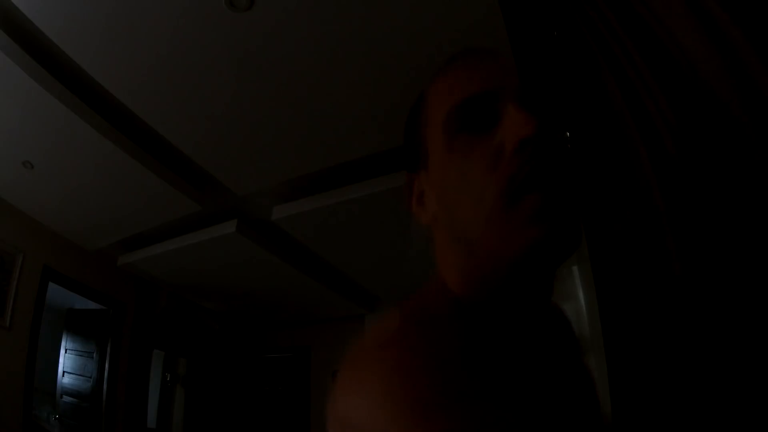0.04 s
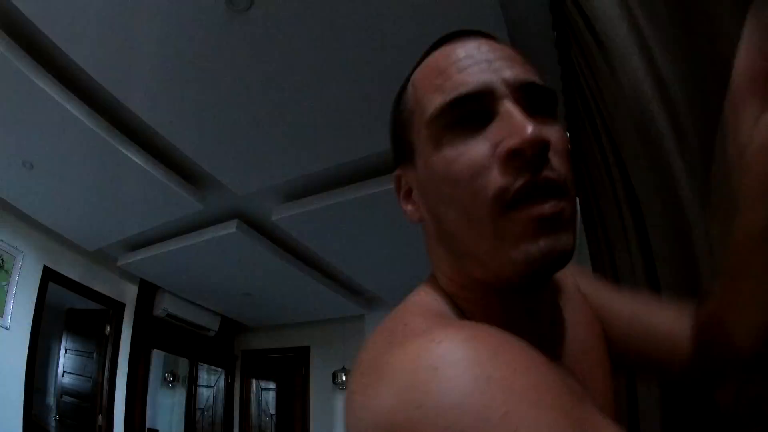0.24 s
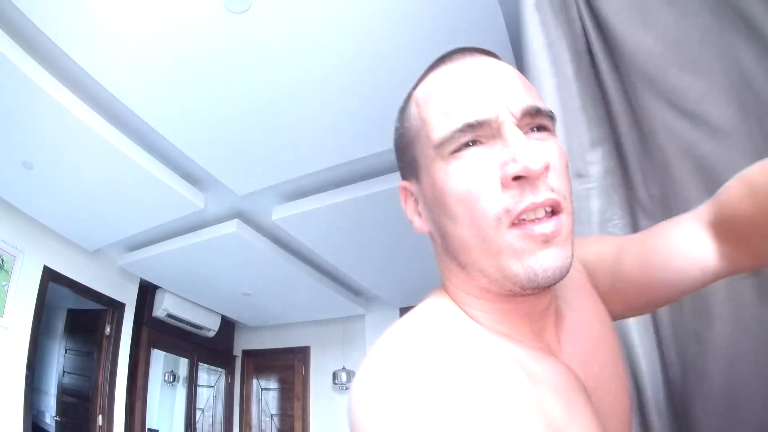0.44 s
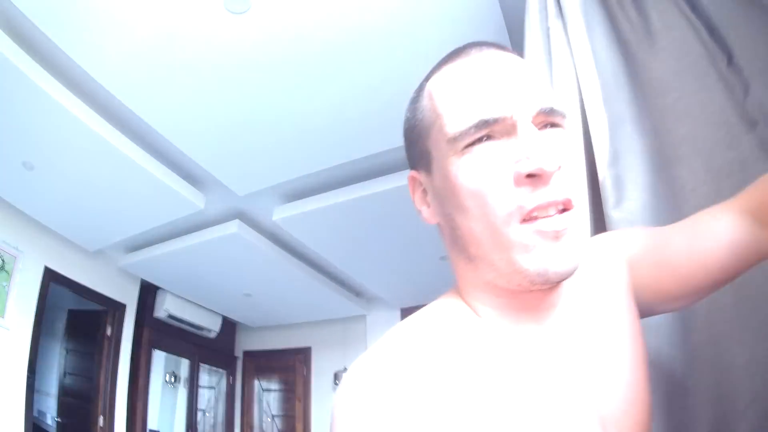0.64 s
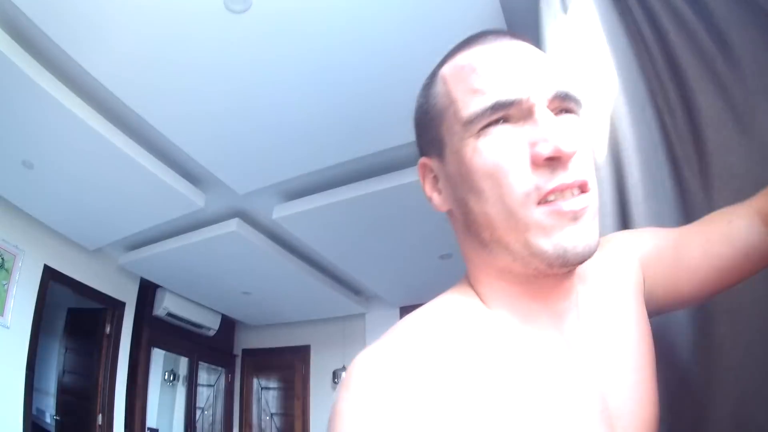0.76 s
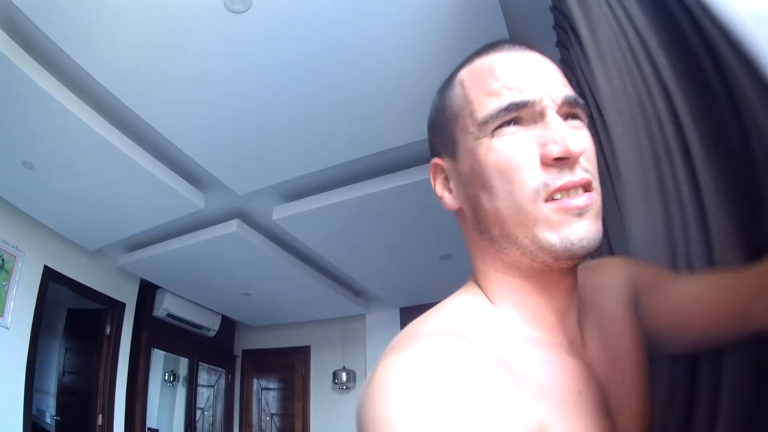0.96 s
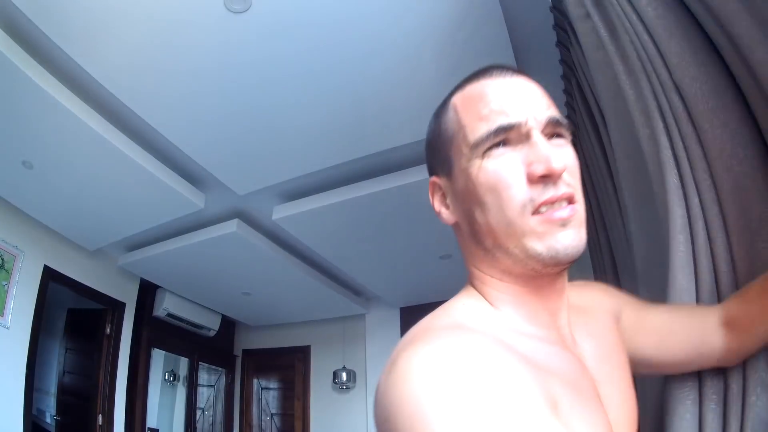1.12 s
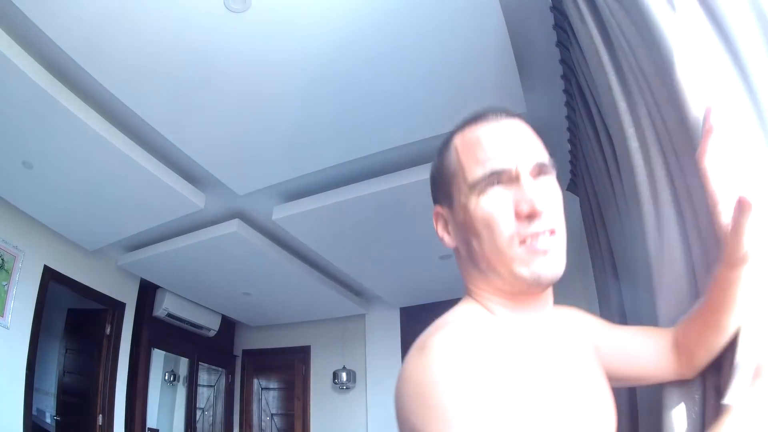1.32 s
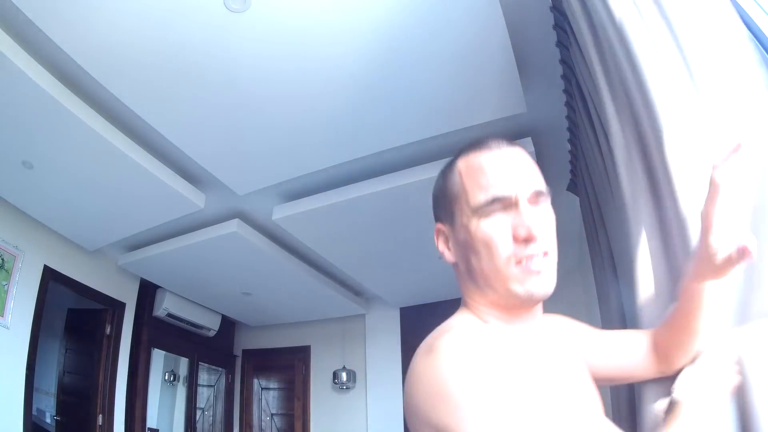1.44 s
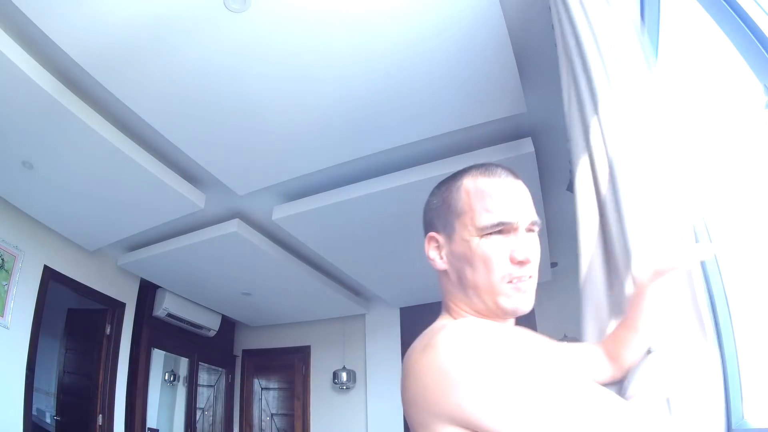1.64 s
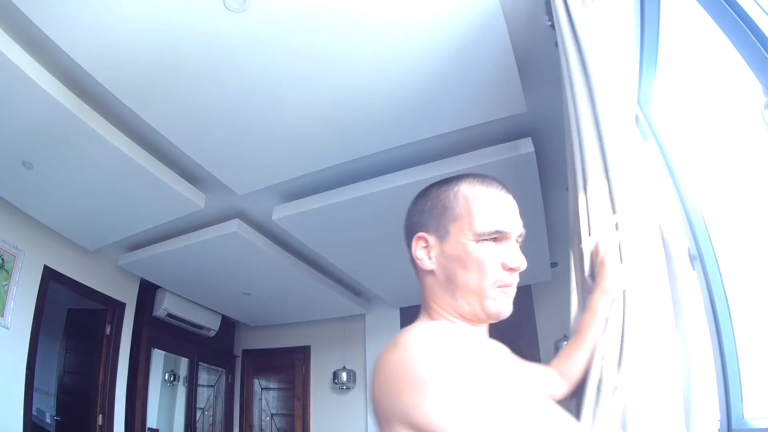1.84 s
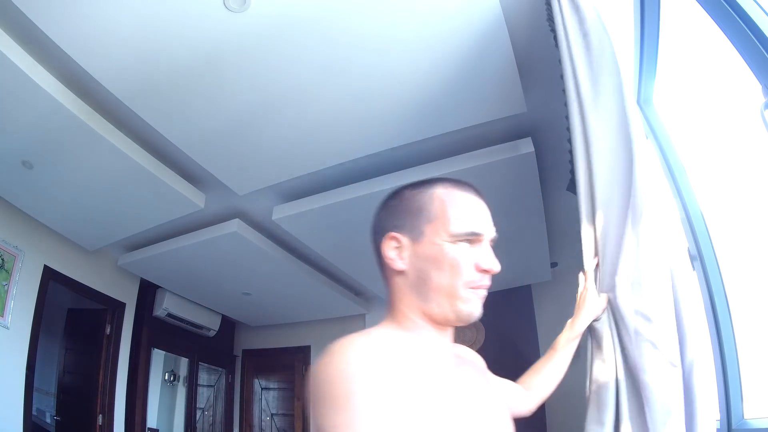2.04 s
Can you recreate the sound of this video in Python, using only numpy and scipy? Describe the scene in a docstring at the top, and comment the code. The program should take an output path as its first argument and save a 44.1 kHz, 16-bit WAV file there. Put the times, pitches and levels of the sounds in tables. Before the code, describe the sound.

Close up in a lightly echoing room, curtain gliders rasp and chatter along a hollow, droning rail. The first drag fades into light knocks, then a second, hissier drag swells and dies into faint ticks.

```python
"""Furnished room: a heavy curtain is dragged along its metal rail in two pulls, close to a small camera.
Gliders scrape (stick-slip grains, smooth rub, singing runners) and chatter (modes rung by random contacts).
The hollow rail drones (noise through resonances) and sways (low bending tone in a shudder).
Folds and rail thud (damped partials); gliders knock together (noise crack plus beating ring).
A decaying noise tail answers as the room, over steady air noise."""
import sys
import numpy as np
from scipy import signal
from scipy.fft import rfft, irfft, next_fast_len
from scipy.io import wavfile
from scipy.ndimage import map_coordinates

SR = 44100
rng = np.random.default_rng(int(sys.argv[2]) if len(sys.argv) > 2 else 0)


def store_pcm(level_fs):
    """Save levels as 16-bit WAV."""
    pcm = np.round(np.clip(level_fs, -1, 1) * 32767).astype(np.int16)
    wavfile.write(sys.argv[1], SR, np.atleast_2d(pcm).T)


def volts(x):
    """Linear amplitude factor 10**(x/20) for a level x in dB, scalar or array-like."""
    e = np.asarray(x, float) / 20
    return 10 ** e


N = 91772

# the hand's two pulls; chatter and weight on the rail are relative to the scrape:
# time_s, scrape_db, chatter_db, weight_db, treble_db
PULLS = [(0, -41, -20, 13, -11), (.045, -35.5, -16, 12.5, 2.5), (.058, -23.5, -23, 6.5, -15),
         (.08, -29, -11.5, 8.5, 1), (.14, -24, -12, 7, -0.5), (.2, -23.5, -12.5, 2, 0),
         (.27, -22, -16, 5, 0.5), (.35, -25, -14, 5, -0.5), (.42, -29.5, -19, 8, 3),
         (.48, -29.5, -14, 7, -19), (.53, -34.5, -24, 6.5, -4.5), (.62, -34.5, -20, 7, -3),
         (.68, -41, -14, 12.5, -2), (.73, -52.5, -18, 13.5, -5), (.77, -55.5, -14, 22.5, -3),
         (.82, -45.5, -13, 11, 0), (.88, -63.5, -12, 14, 3.5), (.97, -63, -28, 19, -2),
         (1.1, -53.5, -14, 13, -12), (1.18, -50.5, -12.5, 19, 19), (1.25, -54.5, -21, 15.5, -1.5),
         (1.285, -44.5, -23, 12.5, -8), (1.3, -41, -19, 6, 2), (1.34, -30.5, -10, 4.5, -2.5),
         (1.39, -36, -18, 7.5, -1), (1.44, -32.5, -15, 6, 0.5), (1.5, -27, -4, 1.5, 2),
         (1.56, -24, -14, -0.5, 3), (1.63, -24, -12, 0, 3.5), (1.7, -27, -12, 1.5, 1.5),
         (1.76, -33, -13, 8, 2), (1.82, -45.5, -16, 14, 2), (1.9, -49, -16, 15.5, 6),
         (2.03, -53.5, -13, 11.5, 2), (2.08, -44.5, -14, 2, 1)]
SECOND_PULL_S = 1.27
# rail colour, one list per pull: freq_hz, relative_level_db
RAIL_COLOURS = [
    [(290, -4), (500, -20), (705, -12.5), (1340, -11.5), (1690, -15), (3360, -13.5), (4540, -18.5),
     (7820, -20.5), (14500, -39.5), (15300, -48)],
    [(290, -28), (500, 0), (545, -12), (594, -9.5), (913, -8.5), (1010, -12), (1670, -12), (2600, -10.5),
     (4110, -17), (6050, -18), (10700, -28.5), (12000, -37), (15300, -40)],
]
# runners singing, one list per pull: freq_hz, width_hz, relative_level_db
RUNNERS = [
    [(2380, 200, -1), (3370, 220, 0)],
    [(2600, 350, 0), (11900, 700, -9)],
]
# singing relative to the coloured rub, one per pull: level_db
SINGING_DB = [-7.5, -16]
SLIPS_PER_S, SLIP_SPREAD_DB, SMOOTH_POWER_SHARE = 2300, 0.5, 0.54
UNEVEN_DB = 0.6  # slow wander of the drag

# glider and hook modes, t60 while rubbing: freq_hz, relative_level_db, t60_s
GLIDER_MODES = [(4810, -11, .03), (7690, -4, .055), (8870, -14, .03), (11560, -6.5, .04),
                (14350, -15, .025)]
CHATTER_PER_S, CHATTER_SPREAD_DB = 300, 3  # contacts of each glider
DETUNE = 0.012  # relative spread of pitch among gliders
BUNCHED_S, BUNCHED_DB = 1.4, 10  # bunched gliders damp one another from here on
FREE_RING = 3  # t60 ratio, knocked glider to rubbing one, before bunching

# hollow rail resonances: freq_hz, width_hz, relative_level_db
RAIL_MODES = [(125.8, 18.8, -3), (163.6, 8.7, 3), (194.4, 19.2, -3), (291, 38, -2.5), (408, 45, -3),
              (480, 33, -5), (530.3, 56, -3.5), (660, 360, -11.5), (1050, 700, -17.5)]
# reverberation: freq_hz, t60_s
ROOM_T60 = [(100, 0.69), (1000, 0.9), (10000, 0.45)]
ROOM_DB = -10.5
# rail swaying on its brackets: time_s, pitch_hz, level_db
SWAY_PATH = [(0.0, 46.7, -20.5), (0.03, 48.2, -42), (0.06, 50.5, -16.5), (0.11, 48.5, -25),
             (0.29, 54.6, -19), (0.32, 48.6, -32.5), (0.52, 48.5, -17.5), (0.54, 46.1, -38),
             (0.65, 47.14, -16.5), (0.77, 48.5, -29), (0.87, 48.8, -23.5), (1.01, 47.3, -37),
             (1.33, 47.3, -31), (1.38, 47.97, -31.5), (1.55, 49, -24.5), (1.66, 59.75, -26),
             (1.72, 58.33, -20), (1.8, 51.2, -29), (1.87, 46.93, -27.5), (2.08, 48.4, -32)]
# loose shudder spectrum: freq_hz, relative_level_db
SHUDDER_COLOUR = [(15, -30), (28, 15), (45, 7.5), (80, 12), (130, 3.5), (200, -46)]
SHUDDER_DB = -6.5  # over the sway tone
# room tone spectrum: freq_hz, relative_level_db
AIR_COLOUR = [(100, -22), (140, -3), (300, -14.5), (700, -21.5), (1500, -25), (3000, -34), (6000, -41),
              (10000, -42.5), (15400, -44)]
AIR_DB = -41.5

# soft thuds of folds and rail: start_s, level_db, pitch_hz, t60_s
THUD_EVENTS = [(.052, -14, 330, .05), (.056, -14, 1300, .04), (.072, -12, 300, .04), (.242, -14, 420, .1),
               (.391, -14, 300, .06), (.485, -14, 300, .05), (.57, -18, 100, .3), (.879, -34, 1000, .02),
               (1.074, -28, 380, .04), (1.101, -30, 500, .03), (1.318, -20, 300, .03),
               (1.89, -23, 400, .05), (.511, -7, 86, .18), (.8155, -26, 880, .05), (1.192, -24, 850, .03),
               (1.2095, -21, 780, .03), (1.249, -25, 500, .025), (1.2525, -17, 340, .04)]
# thud partials: ratio_to_pitch, amplitude_share
PARTIALS = [(.62, .35), (1, 1), (1.6, .45), (2.4, .25)]
THUD_RISE_S = 0.00095
# gliders knocking together, ring relative to level_db: start_s, level_db, ring_db
KNOCKS = [(0.0553, -15.5, -18.5), (0.3974, -20.5, -20), (0.6184, -25, -17), (0.6794, -37, -16),
          (0.7208, -43, -16), (0.7811, -37, -18), (0.7998, -40, -13), (0.8129, -29, -13),
          (1.1359, -35.5, -20), (1.1774, -25.5, -17), (1.291, -37, -16), (1.321, -37, -16),
          (1.3824, -32, -19), (1.4115, -27, -14), (1.7594, -22, -14), (1.8382, -29.5, -11),
          (2.0502, -36.5, -16)]
# knock noise spectrum: freq_hz, relative_level_db
CRACK_COLOUR = [(300, -32), (1500, 12), (2500, 0), (6000, -3), (12000, -10), (15500, -26)]
CRACK_T60_S = 0.044
TOP_HZ = 15050


def unit(x):
    """Scaled to rms 1."""
    return x / np.sqrt(np.mean(x ** 2) + 1e-20)


def along(points, hz):
    """(Hz, value) points interpolated on a log frequency axis."""
    f, v = np.transpose(points)
    return np.interp(np.log(hz + 1), np.log(f + 1), v)


def curves(rows):
    """One value per sample for each column after the time."""
    time_s, *columns = np.transpose(rows)
    return [np.interp(np.arange(N) / SR, time_s, column) for column in columns]


def wobble(knots_per_s):
    """Smooth random curve."""
    return map_coordinates(rng.standard_normal(400), [np.arange(N) * knots_per_s / SR])


def filtered(x, response):
    """x times a complex response of frequency."""
    size = next_fast_len(N + SR // 2)
    return irfft(rfft(x, size) * response(np.fft.rfftfreq(size, 1 / SR)), size)[:N]


def coloured(x, points):
    """x shaped by a (Hz, dB) curve."""
    return filtered(x, lambda f: volts(along(points, f)))


def mode(hz, width_hz):
    """One causal resonance."""
    return lambda f: 1j * f * width_hz / (hz * hz - f * f + 1j * f * width_hz)


def contacts(rate_per_s, spread_db):
    """Random impulses with a long tail of sizes."""
    chance, size, sign = rng.random((3, N))
    heights = volts(-spread_db * np.log(size + 1e-9)) * np.sign(sign - 0.5)
    return unit((chance < rate_per_s / SR) * heights)


def scrape(treble_db):
    """Stick-slip grains, smooth rub and singing runners, coloured by the stretch of rail under each pull."""
    smooth = np.sqrt(SMOOTH_POWER_SHARE) * rng.standard_normal(N)
    grains = np.sqrt(1 - SMOOTH_POWER_SHARE) * contacts(SLIPS_PER_S, SLIP_SPREAD_DB)
    rub = (smooth + grains) * volts(UNEVEN_DB * wobble(14.35) + 0.75 * wobble(55))
    pulls = []
    for colour, runner, sing_db in zip(RAIL_COLOURS, RUNNERS, SINGING_DB):
        def runner_response(f):
            return sum(volts(db) * mode(hz, width_hz)(f) ** 2 for hz, width_hz, db in runner)

        sing = filtered(contacts(1800, 2.2), runner_response)
        body = coloured(rub, [(150, -52)] + list(colour))
        pulls.append(unit(body) + volts(sing_db) * unit(sing))
    both = np.where(np.arange(N) < SECOND_PULL_S * SR, *pulls)
    treble = filtered(both, lambda f: 1 / (1 + (5500 / (f + 1)) ** 4))
    return both + (volts(treble_db) - 1) * treble


def chatter():
    """Three slightly different gliders, each rung by its own random contacts."""
    out = np.zeros(N)
    for glider in (-1, 0, 1):
        def ring_response(f):
            total = 0
            for hz, db, t60_s in GLIDER_MODES:
                width_hz = np.log(1000) / np.pi / t60_s
                total = total + volts(db) * np.sqrt(t60_s) * mode(hz * (1 + DETUNE * glider), width_hz)(f)
            return total

        out += filtered(contacts(CHATTER_PER_S, CHATTER_SPREAD_DB), ring_response)
    return unit(out)


def drone():
    """Loaded gliders judder and shake the hollow rail's resonances."""
    judder = rng.standard_normal(N) * volts(UNEVEN_DB * wobble(29.86) + 2.1 * wobble(90))

    def rail_response(f):  # signs alternate
        return sum((-1) ** k * volts(db) * mode(hz, width_hz)(f)
                   for k, (hz, width_hz, db) in enumerate(RAIL_MODES))

    return unit(filtered(judder, rail_response))


def room(x):
    """Noise tail in which each frequency dies at its own speed."""
    hz, t, noise = signal.stft(rng.standard_normal(SR // 2), SR, nperseg=256)
    decay = volts(-60 * t / along(ROOM_T60, hz)[:, None])
    tail = signal.istft(noise * decay, SR, nperseg=256)[1]
    delayed = np.pad(x, (200, 0))
    return signal.fftconvolve(delayed, tail / np.linalg.norm(tail))[:N]


def sway():
    """Low, unsteady bending tone with a weak octave, in a loose shudder."""
    pitch_hz, level_db = curves(SWAY_PATH)
    phase = 2 * np.pi * np.cumsum(pitch_hz) / SR + 0.5 * wobble(25.16)
    shudder = unit(coloured(rng.standard_normal(N), SHUDDER_COLOUR))
    partials = np.sin(phase) + volts(-14.5) * np.sin(2 * phase)
    tone = np.sqrt(2) * volts(UNEVEN_DB * wobble(20)) * partials
    return volts(level_db) * (tone + volts(SHUDDER_DB) * shudder)


def room_tone():
    """Steady air noise above 100 Hz."""
    air = filtered(rng.standard_normal(N), lambda f: volts(along(AIR_COLOUR, f)) * (f > 100))
    return volts(AIR_DB) * unit(air)


def thuds():
    """Damped rings whose higher partials die faster."""
    out, t = np.zeros(N + SR), np.arange(SR // 2) / SR
    rise = 1 - np.exp(-t / THUD_RISE_S)
    for start_s, level_db, pitch_hz, t60_s in THUD_EVENTS:
        ring = sum(share * volts(-60 * t * ratio / t60_s) * np.sin(2 * np.pi * ratio * pitch_hz * t)
                   for ratio, share in PARTIALS)
        out[round(start_s * SR):][:len(t)] += volts(level_db) * ring * rise
    return out[:N]


def knocks():
    """Each knock is a short noise crack and the beating ring of the two gliders that meet."""
    rings, cracks, t = np.zeros(N + SR), np.zeros(N), np.arange(SR // 4) / SR
    for start_s, level_db, ring_db in KNOCKS:
        luck = rng.standard_normal((len(GLIDER_MODES) * 2, 2))
        lasts = FREE_RING if start_s < BUNCHED_S else 1
        ring = 0
        for (hz, db, t60_s), (level_luck, pitch_luck) in zip(GLIDER_MODES * 2, luck):
            envelope = volts(db + 0.95 * level_luck - 60 * t / (lasts * t60_s))
            ring = ring + envelope * np.sin(2 * np.pi * hz * (1 + DETUNE / 2 * pitch_luck) * t)
        rings[round(start_s * SR):][:len(t)] += volts(level_db + ring_db) * ring * (1 - np.exp(-t / 0.0021))
        after_s = np.maximum(np.arange(N) / SR - start_s, 0)
        cracks += volts(level_db - 3.5 - 60 * after_s / CRACK_T60_S) * (1 - np.exp(-after_s / 0.00089))
    return rings[:N] + cracks * unit(coloured(rng.standard_normal(N), CRACK_COLOUR))


def scene():
    """All sources in the room; sway and air bypass the reverberation."""
    pull_db, chatter_db, weight_db, treble_db = curves(PULLS)
    bunched_db = BUNCHED_DB * np.clip((np.arange(N) / SR - BUNCHED_S) / 0.13, 0, 1)
    drag = scrape(treble_db)
    drag = drag + volts(chatter_db - bunched_db) * chatter()
    drag = drag + volts(weight_db) * drone()
    curtain = volts(pull_db) * drag + thuds() + knocks()
    mix = volts(-1.1) * curtain + volts(ROOM_DB) * room(curtain) + sway() + room_tone()
    return mix[None]


def roll_off(x):
    """The treble ends steeply here."""
    return signal.sosfilt(signal.butter(12, 15490, fs=SR, output="sos"), x)


def record(dry):
    """The camera's band limit."""
    mix = filtered(dry[0], lambda f: f < TOP_HZ)[None]
    return roll_off(mix)


dry = scene()
out = record(dry)
store_pcm(out)
```